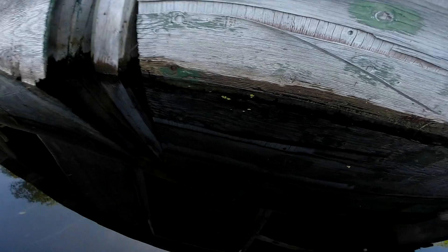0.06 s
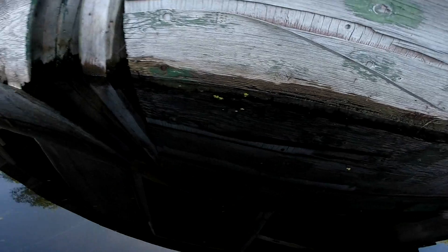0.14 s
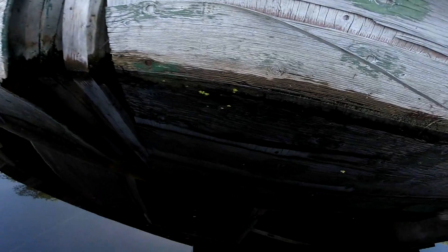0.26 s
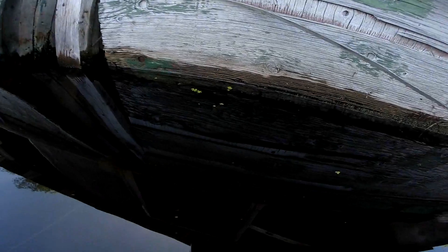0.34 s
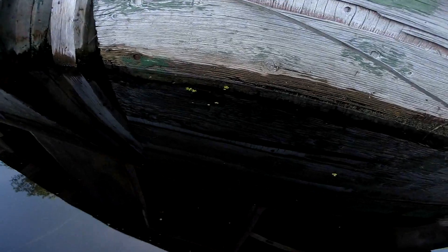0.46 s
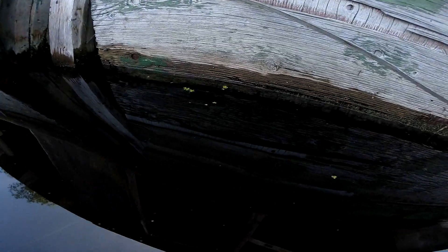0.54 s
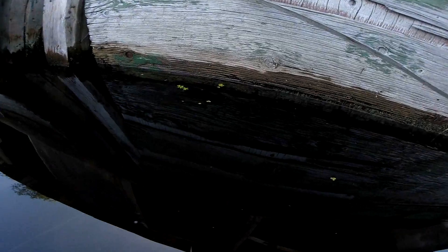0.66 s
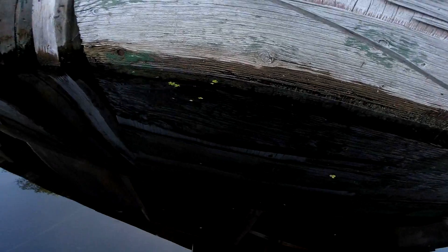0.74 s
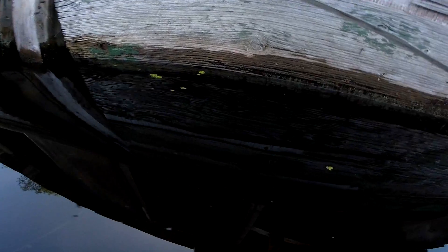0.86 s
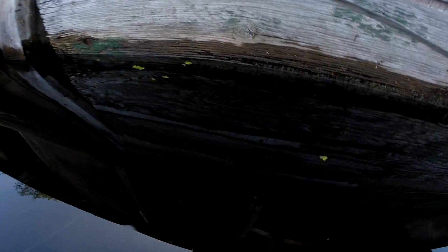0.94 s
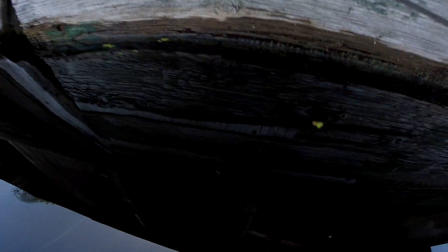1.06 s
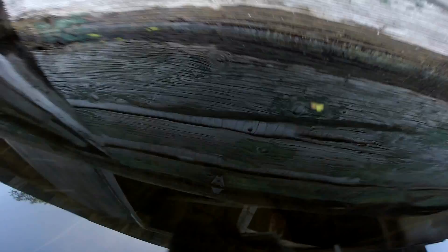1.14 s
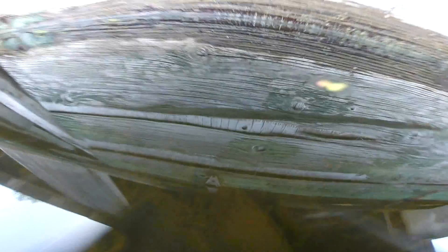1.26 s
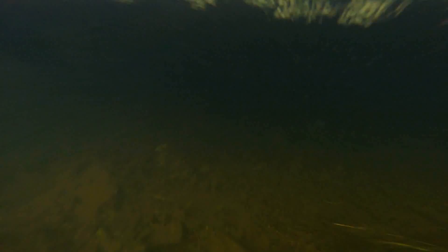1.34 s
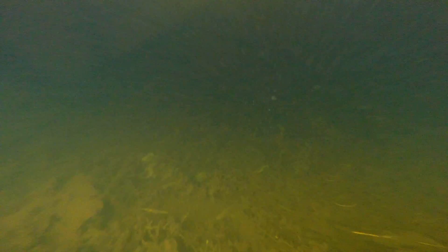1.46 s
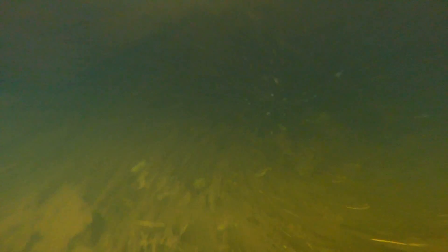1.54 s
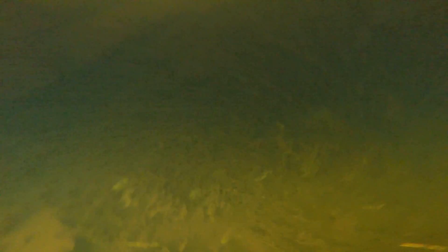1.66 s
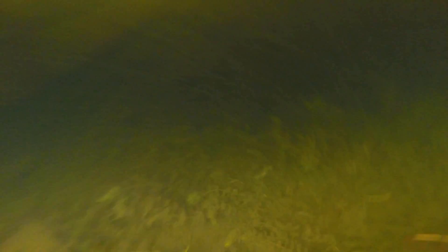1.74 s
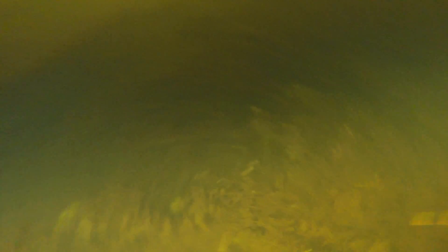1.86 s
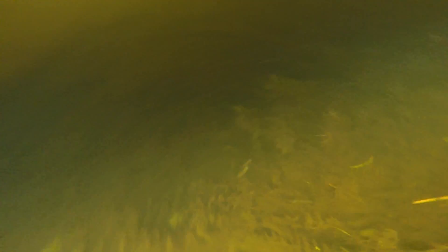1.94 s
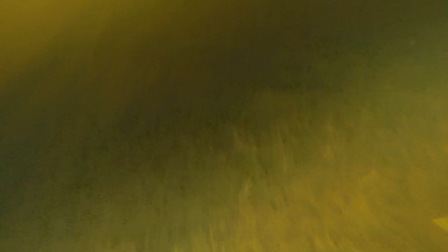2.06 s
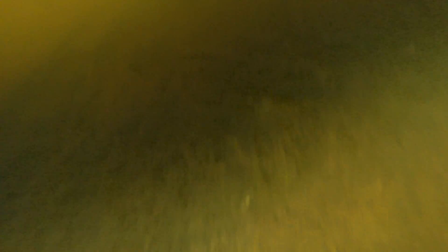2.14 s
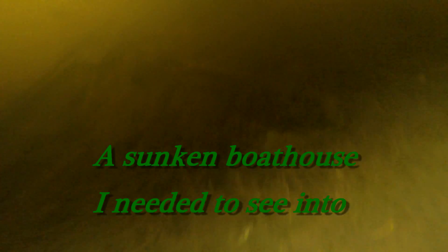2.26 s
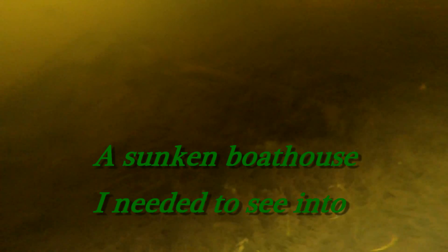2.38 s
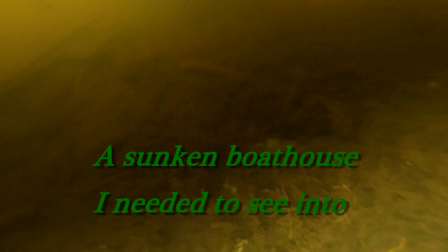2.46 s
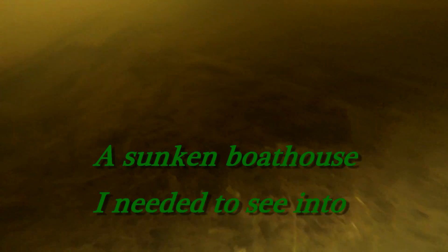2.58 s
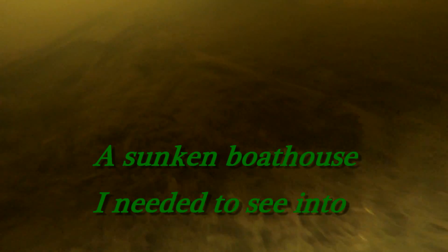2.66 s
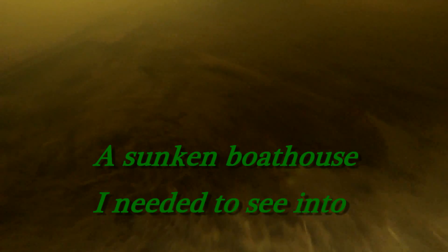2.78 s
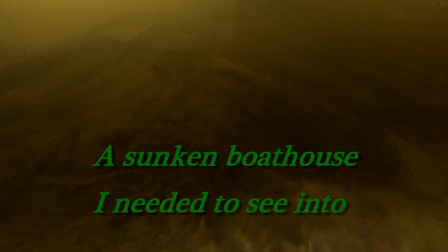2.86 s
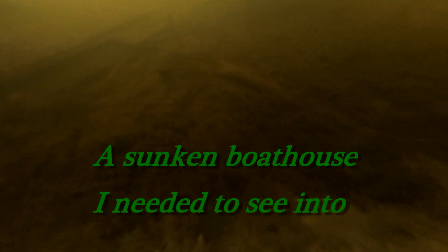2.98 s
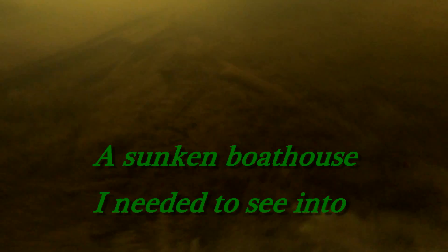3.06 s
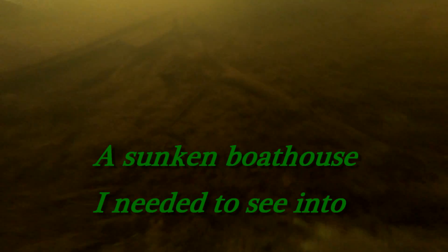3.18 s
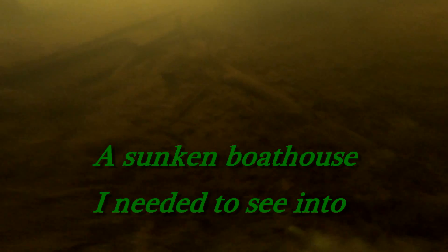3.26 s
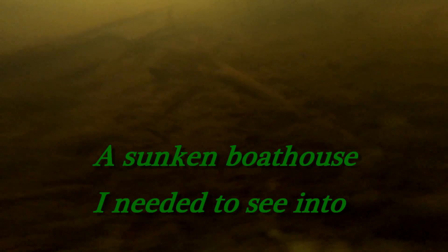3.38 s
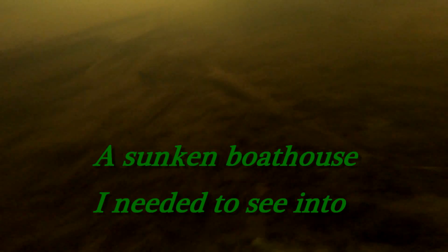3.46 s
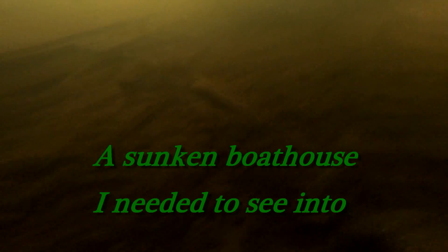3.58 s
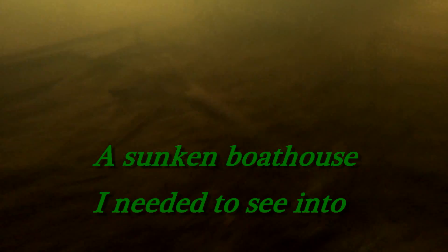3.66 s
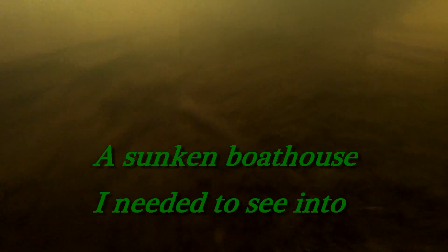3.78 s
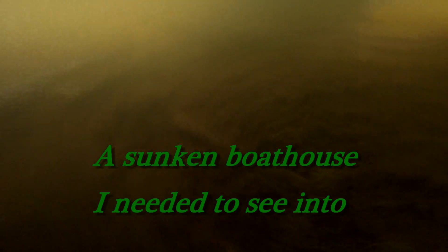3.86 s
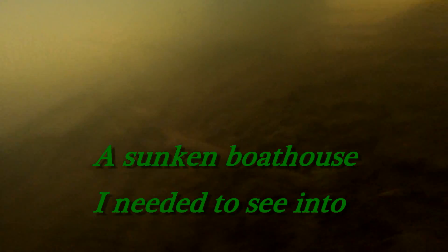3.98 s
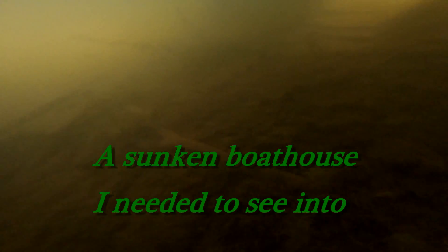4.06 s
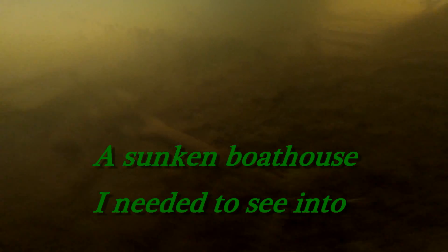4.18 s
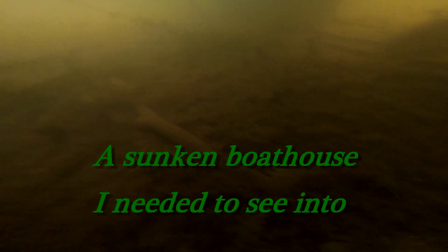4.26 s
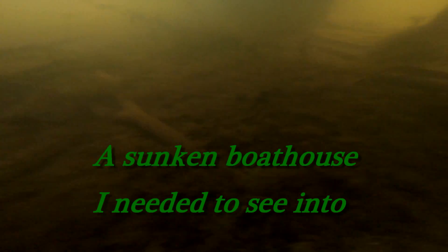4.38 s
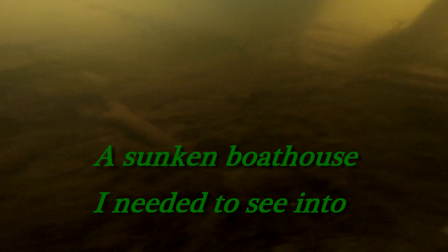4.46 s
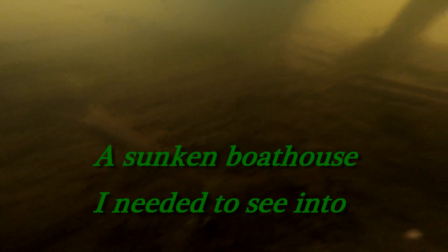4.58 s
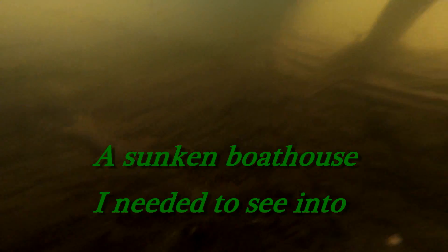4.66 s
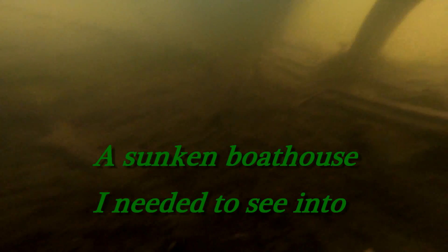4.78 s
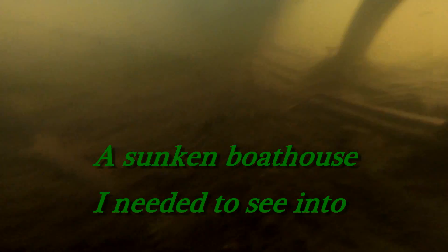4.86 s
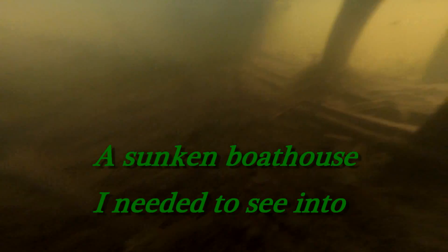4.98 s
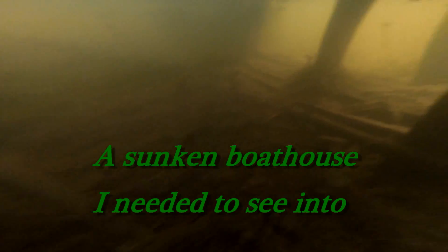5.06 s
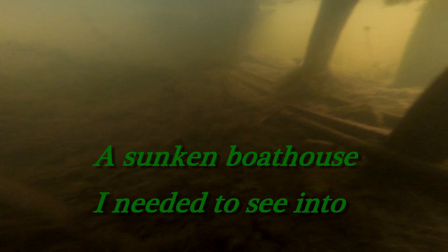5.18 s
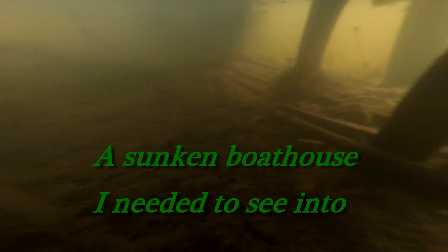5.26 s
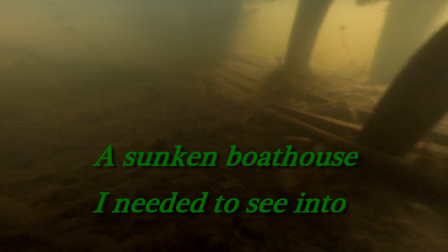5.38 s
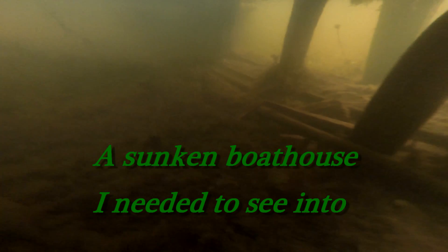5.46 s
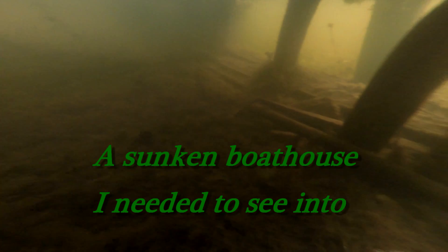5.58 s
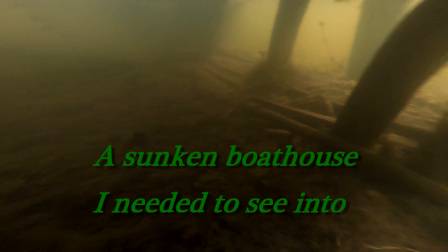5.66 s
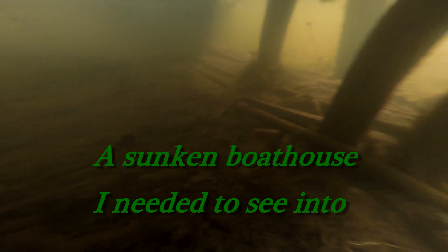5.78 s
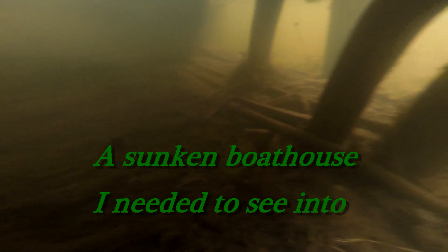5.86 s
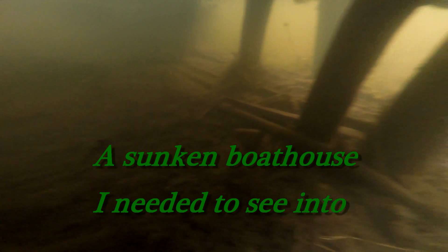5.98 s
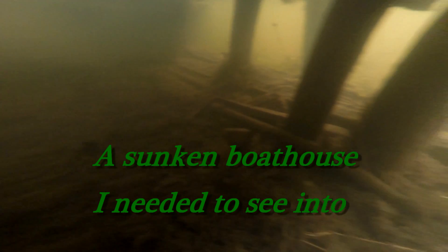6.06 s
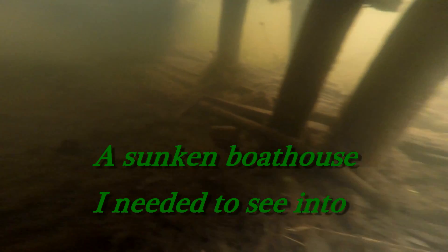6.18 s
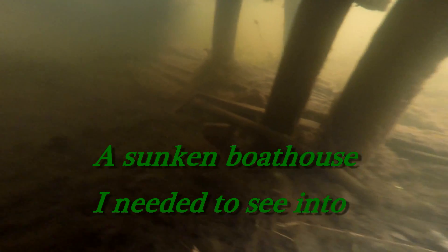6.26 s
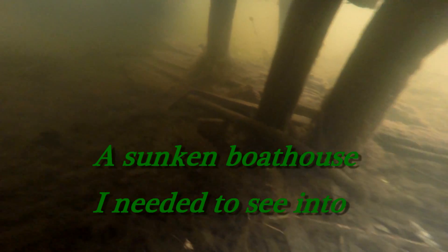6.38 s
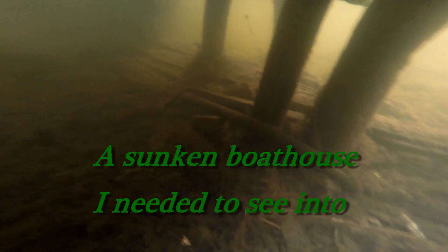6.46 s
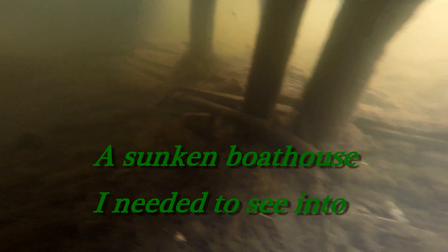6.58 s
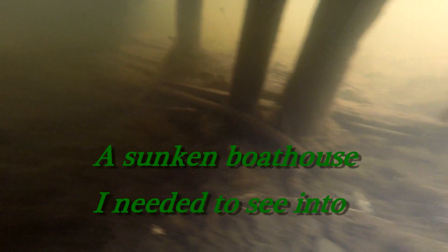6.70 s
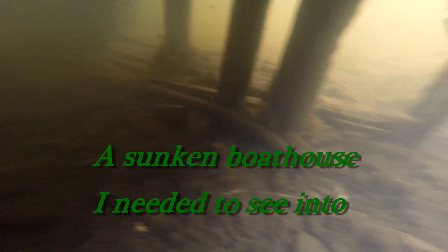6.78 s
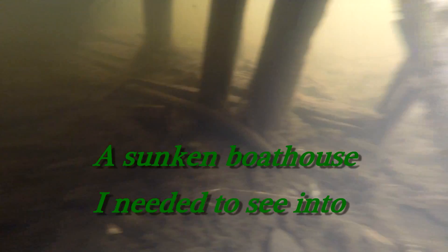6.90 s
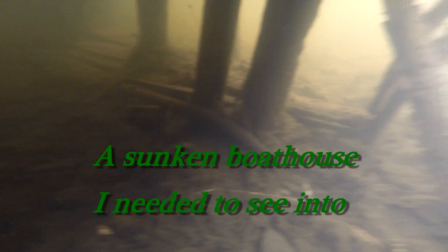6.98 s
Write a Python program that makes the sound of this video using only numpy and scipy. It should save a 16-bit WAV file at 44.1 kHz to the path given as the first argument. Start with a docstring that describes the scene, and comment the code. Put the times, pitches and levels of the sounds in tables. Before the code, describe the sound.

A soft knock and a low rumble come from a swaying pole, heard through a microphone in a sealed housing over faint hiss. At about 1.4 seconds it dips into a river: water splashes and slaps the housing, and bubbles gurgle and ring until around 2 seconds, with a few more pops near 2.4. Underwater, a faint, fast, gritty clatter like a distant boat engine fades in by 2.8 seconds, with a thin pulsing whine. Dull knocks on the pole run from about 2.4 to 4.1 seconds. The hardest, at 3 seconds, briefly ducks all the sound, which then creeps back. The pole rubs and knocks again around 3.7 to 4 seconds as the rumble swells. After that the engine clatter continues to the end at about 7 seconds, slightly duller, over low rumble, with one small click near 6.5 seconds.

```python
"""A low rumble and a soft knock from a swaying camera pole, then a splash as it dips into a river.
Water slaps the housing and trapped air leaves it in ringing bubbles. Under the surface the pole
knocks and rubs, and the fast clatter of what seems a distant boat engine carries through the water.
The hardest knock pushes the camera's gain down, and it creeps back."""
import sys
import numpy as np
from scipy import signal
from scipy.fft import rfft, irfft
from scipy.io import wavfile
from scipy.ndimage import uniform_filter1d, minimum_filter1d

SR = 44100
rng = np.random.default_rng(int(sys.argv[2]) if len(sys.argv) > 2 else 0)


def to_wav(sig):
    """Store sig (one row per channel, or 1-D mono) as 16-bit WAV at the path in sys.argv[1].

    Samples outside -1..1 are clipped; the rate is SR.
    """
    pcm = np.clip(np.atleast_2d(sig), -1, 1) * 32767
    pcm = np.round(pcm).astype(np.int16)
    wavfile.write(sys.argv[1], SR, pcm.T)  # frames by channels


N = 310155
T = np.arange(N) / SR
DIP_S = 1.437   # the housing meets the water


def from_db(db):
    """Decibels to gain."""
    return 10 ** (np.asarray(db) / 20)


def rms_one(x):
    """Scale to unit power."""
    return x / np.sqrt(np.mean(x ** 2) + 1e-20)


def gains(rows):
    """One gain curve per dB column of a table in time."""
    times_s, *columns = np.transpose(rows)
    return [from_db(np.interp(T, times_s, db)) for db in columns]


def fade(t, t60_s):
    """Free decay, 60 dB down after t60_s."""
    return np.exp(-np.log(1000) * t / t60_s)


def swells(rows, attack_s):
    """Gain curve of swells that rise and decay, summed in power."""
    power = np.zeros(N)
    for peak_s, db, t60_s in rows:
        rise = np.exp(np.minimum(T - peak_s, 0) / attack_s)
        power += (from_db(db) * rise * fade(np.maximum(T - peak_s, 0), t60_s)) ** 2
    return np.sqrt(power)


def add(out, start_s, sound):
    """Mix a sound in at start_s."""
    start = max(round(start_s * SR), 0)
    out[start:start + len(sound)] += sound[:max(N - start, 0)]


def band(x, low_hz, high_hz, order=2):
    """Butterworth band-pass."""
    return signal.sosfilt(signal.butter(order, [low_hz, high_hz], "band", fs=SR, output="sos"), x)


def resonate(x, hz, width_hz):
    """Two-pole resonance, peak gain 1."""
    r = np.exp(-np.pi * width_hz / SR)
    feedback = [1, -2 * r * np.cos(2 * np.pi * hz / SR), r * r]
    return signal.lfilter(np.array([1, 0, -1]) * (1 - r * r) / 2, feedback, x)


def band_noise(low_hz, high_hz, samples=N):
    """Band-passed noise, rms 1."""
    return rms_one(band(rng.standard_normal(samples), low_hz, high_hz))


def noise(spectrum):
    """Noise shaped by (Hz, dB) points, rms 1."""
    hz, db = np.transpose(spectrum)
    bins_hz = np.maximum(np.arange(N // 2 + 1) * SR / N, 1)
    shape = from_db(np.interp(np.log(bins_hz), np.log(hz), db))
    return rms_one(irfft(rfft(rng.standard_normal(N)) * shape, N))


def handling(rest_db=-66):
    """The swaying pole rumbles and slips unevenly in the grip; a faint rub stays under water."""
    # Pole sway. Each row: time in seconds, rumble level in dB.
    sway = [(0,-37),(.5,-46.5),(1.6,-37),(2.05,-40.5),(2.45,-31),(3.6,-32),(4.05,-25.5),(5.1,-36.5),(7.03,-34.5)]
    # Slips in the grip. Each row: peak time in seconds, level in dB, t60 in seconds.
    rubs = [(2.2,-53,1),(2.8,-46,.6),(3.32,-43,0.68),(3.73,-34,0.54),(3.86,-44,0.47),(3.98,-36.5,0.59),(4.2,-43,1)]
    # Spectra of rumble and rub. Each row: frequency in Hz, relative density in dB.
    rumble_spectrum = [(8.8, -29), (15, 3), (27, 5.5), (54, -9.5), (87, -4), (101, -11), (119, -14.5),
                       (162, -45.5), (300, -33.5), (390, -64), (660, -120)]
    rub_spectrum = [(120,-13),(200,-10.5),(310,2),(440,-6.5),(680,-0.5),(950,-13),(1400,-4),(2500,-62),(9000,-93)]
    roughness = rms_one(np.exp(0.13 * band_noise(45, 120)))
    rub_gain = swells(rubs, attack_s=0.029) + from_db(rest_db) * (T > DIP_S)
    return gains(sway)[0] * noise(rumble_spectrum) + rub_gain * roughness * noise(rub_spectrum)


def hiss(level_db=-55):
    """Steady, faint background noise."""
    # Noise floor. Each row: frequency in Hz, relative density in dB.
    spectrum = [(88, -25), (150, 4.5), (226, -1.5), (270, -3.5), (309, -4), (702, -9.5), (1260, -14.5),
                (1420, -8), (2400, -16), (3490, -19), (13700, -35.5), (15100, -29.5), (16000, -54)]
    return from_db(level_db) * noise(spectrum)


def knocks(ring_db=-13.5, ring_db_per_db=0.65, shudder_db=-10.5, clack_lead_s=0.0058, air_ratio=1.18):
    """A contact clacks, shoves the housing to and fro once, and leaves the pole ringing and shuddering."""
    # Knocks on the pole. Each row: time in seconds, thud level in dB, thud in Hz, clack peak in dB.
    contacts = [(0.045,-22.5,77.5,-65),(2.366,-27,43.4,-26),(2.721,-18.5,45.5,-52),(2.75,-11,79,-36),(2.828,-15.5,53.7,-36),(3.0076,19,100,8),(3.054,1,87,-31.5),
                (3.127,-13,61,-20.5),(3.36,-11,40,-57),(3.392,-29.5,44.7,-56),(3.747,-17.5,81,-38),(3.783,-26,74,-30),(3.968,-9,74,-10.5),(4.006,-14,85,-46),(4.079,-15,62,-51)]
    # Pole modes under water. Each row: frequency in Hz, relative level in dB, t60 in seconds.
    modes = [(48.6,14,0.055),(91.6,10.5,0.22),(134.2,-9.5,0.4),(200,-25,0.105)]
    out, t = np.zeros(N), T[:SR // 2]
    for at_s, thud_db, thud_hz, clack_db in contacts:
        swing = 2 * np.pi * thud_hz * (T - at_s)
        out += from_db(thud_db) * swing * np.exp((1 - swing ** 2) / 2)
        tuning = air_ratio if at_s < DIP_S else 1   # modes lie higher in air
        ring = sum(from_db(db) * np.sin(2 * np.pi * tuning * hz * t) * fade(t, t60_s)
                   for hz, db, t60_s in modes)
        shudder = from_db(shudder_db) * band_noise(35, 163, len(t)) * fade(t, t60_s=0.34)
        onset = 1 - fade(t, 0.024)
        add(out, at_s, from_db(ring_db + ring_db_per_db * thud_db) * (ring + shudder) * onset)
        clack = band(rng.standard_normal(len(t)) * fade(t, t60_s=0.039), 170, 620)
        add(out, at_s - clack_lead_s, from_db(clack_db) * clack / np.abs(clack).max())
    return out


def bubble(hz, t60_s, rise, attack_cycles):
    """An air pocket rings, its pitch creeping up as it decays."""
    t = T[:int(1.5 * t60_s * SR)]
    phase = 2 * np.pi * hz * t * (1 + rise * t / t60_s / 2)
    onset = (1 - np.exp(-t * hz / attack_cycles)) ** 2
    return np.sin(phase) * fade(t, t60_s) * onset


def froth(count=480, span_s=0.7, low_hz=480, high_hz=4200, ring_cycles=15, attack_s=0.0044,
          fizz_db=-25, fizz_per_s=900, fizz_spread_db=6.0):
    """Each surge drags under a swarm of small bubbles; the tiniest crackle."""
    # Water closing over the housing. Each row: peak time in seconds, level in dB, t60 in seconds.
    surges = [(1.438,-32,0.62),(1.562,-26.5,0.7),(1.715,-14.5,0.081),(1.79,-25,0.14),(1.83,-46,0.083)]
    swarm = np.zeros(N)
    for when, height, strength in rng.random((count, 3)):
        hz = low_hz * (high_hz / low_hz) ** height
        gain = strength ** 2 * (hz / low_hz) ** -0.12
        ping = bubble(hz, ring_cycles / hz, rise=0.12, attack_cycles=0.8)
        add(swarm, DIP_S - attack_s + when * span_s, gain * ping)
    pops = rng.random(N) < fizz_per_s / SR
    pop_db = fizz_spread_db * np.minimum(rng.exponential(1, N), 4)
    fizz = from_db(fizz_db) * rms_one(band(pops * from_db(pop_db), 2490, 13000))
    return (swarm / np.std(swarm[swarm != 0]) + fizz) * swells(surges, attack_s)


def gurgle(level_db=4.0, wobble_depth=0.16, pinch_db=-35.5, pinch_t60_s=0.0065):
    """Bubbles click as they pinch off, then ring and wobble; the housing thumps twice in the splash."""
    # Ringing bubbles, and two low housing thumps voiced the same way. Each row: start in seconds,
    # nominal pitch in Hz, relative level in dB, nominal t60 in seconds.
    bubbles_and_thumps = [(1.4404,3030,-1.5,0.0044),(1.457,125,-4.5,0.092),(1.46,305,-13.5,0.032),(1.4818,830,-3.5,0.013),(1.4886,2010,-16,0.027),(1.5193,1600,-19.5,0.025),(1.5402,1520,-17.5,0.019),
                          (1.5653,2055,-2.5,0.013),(1.5702,1375,-10.5,0.016),(1.591,2990,-9,0.014),(1.610,724,-8,0.043),(1.644,4730,-25,0.017),(1.66,1600,-15,0.017),(1.678,1934,-17.5,0.074),(1.685,3150,-10,0.015),
                          (1.7124,308,3.5,0.0072),(1.714,87.6,-11,0.12),(1.762,790,-16,0.022),(1.776,407,-17,0.049),(1.7913,754,-7.5,0.053),(1.8039,2800,-11,0.014),(1.817,747,-12.5,0.018),(1.829,2040,-21,0.054),(1.840,2480,-25,0.033),(1.842,730,-18.5,.07),
                          (1.8641,813,-10,0.05),(1.8656,497,-15,0.05),(1.897,787,-25.5,0.083),(1.921,2320,-20.5,0.022),(2.026,730,-42.5,0.11),(2.079,706,-7,0.0092),(2.095,883,-29.5,0.052),(2.1486,710,-12.5,0.0098),
                          (2.2697,490,-20,0.031),(2.2863,486,-15.5,0.015),(2.3446,620,-16.5,.018),(2.3712,576,-11.5,0.0091),(2.4397,8300,-16,0.0063),(2.439,730,-26,.021),
                          (4.001,1180,-29,0.039),(4.2,2560,-21.5,0.0094)]
    # Side notes of an out-of-round bubble. Each row: ratio to nominal pitch, relative level in dB.
    side_notes = [(.6,-13),(1.9,-17.5)]
    main_note = [(0.93, 0.011)]   # same columns
    rings, pinches, t = np.zeros(N), np.zeros(N), T[:SR // 20]
    for start_s, hz, db, t60_s in bubbles_and_thumps:
        for ratio, note_db in main_note + (side_notes if 350 < hz < 1700 else []):
            ping = bubble(hz * ratio, t60_s / ratio, rise=0.09, attack_cycles=0.3)
            add(rings, start_s, from_db(db + level_db + note_db) * ping)
        click = rng.standard_normal(len(t)) * fade(t, pinch_t60_s)
        add(pinches, start_s, from_db(db + pinch_db) * click)
    wobble = 1 + wobble_depth * band_noise(93, 670)
    return rings * wobble + band(pinches + 1e-18, 1200, 6500)


def slaps(edge_ratio=1.29, level_db=-10.0):
    """Water slaps the housing and films burst on it, each a brief, broad crack."""
    # Cracks. Each row: start in seconds, relative level in dB, centre in Hz, t60 in seconds.
    cracks = [(1.4416,-12.5,4590,0.047),(1.453,-2,8900,.008),(1.4574,-1,6200,0.004),(1.459,-8,4970,0.03),(1.481,-12.5,4800,0.024),(1.5056,-31.5,7560,.017),(1.5606,-26.5,11900,0.0024),(1.58,-17,3560,0.028),
              (1.621,-2.5,5260,0.0099),(1.662,-12.5,4500,0.0047),(1.686,-15,2810,0.0034),(1.7071,-10.5,6950,0.0075),(1.713,-5.5,8650,0.0095),(1.717,-7,2400,0.027),
              (1.7744,-13,4930,0.009),(1.798,-18,8300,0.0052),(2.3178,-20.5,2740,0.0059),(2.4403,-13,7000,0.0036),(2.493,-12,1940,0.011),
              (3.6274,-39,8400,0.0034),(4.613,-40,7200,0.0093),(6.4855,-18,1980,0.04),(6.487,-24.5,5440,0.025)]
    out, t = np.zeros(N), T[:SR // 10]
    for start_s, db, hz, t60_s in cracks:
        crack = band(rng.standard_normal(len(t)) * fade(t, t60_s), hz / edge_ratio, hz * edge_ratio)
        onset_rms = np.std(crack[:SR // 700])
        add(out, start_s, from_db(db + level_db) * crack / onset_rms)
    return band(out, 240, 12000, order=5)


def engine_cycles(first_beat_s=0.0703):
    """Engine cycles since the first beat, per sample."""
    # Engine speed. Each row: time in seconds, cycles per second.
    speed = [(2.35,11.964),(2.96,12.244),(4.26,12.261),(4.71,11.625),(5.34,12.691),(5.94,11.864),(6.63,11.871),(6.78,12.936)]
    cycles = np.cumsum(np.interp(T, *np.transpose(speed))) / SR
    return cycles - np.interp(first_beat_s, T, cycles)


def clatter_filter(x, resonances, leak_db=-50.0):
    """The engine's resonances in alternating polarity; shallow water passes only the highs."""
    modes = sum((-1) ** k * from_db(db) * resonate(resonate(x, hz, 1.33 * width_hz), hz, 1.31 * width_hz)
                for k, (hz, width_hz, db) in enumerate(resonances))
    return band(modes + from_db(leak_db) * x, 1180, 13000, order=6)


def engine(tick_db=4.5, rattle_db=1.0, ring_gain=3.2, bright_hz=2800, jitter_s=0.0004, jitter_db=0.8):
    """Four uneven beats a cycle, each a gritty tick, a short rattle and a ring, over a rough wash."""
    # Beats of one cycle. Each entry: relative level in dB.
    beats_db = [1, -12, -5.5, -11]
    # The engine fades in after the splash, then dulls.
    # Each row: time in seconds, wash gain in dB, beat gain in dB, treble lift in dB.
    levels = [(2.0,-59,-39,8.5),(2.75,-43.5,-28.5,7.5),(4.2,-42,-28.5,4),(5.3,-43,-30,1.7),(6.1,-44,-28,1.6),(7.03,-46.5,-27,2.5)]
    # Clatter resonances. Each row: centre in Hz, nominal width in Hz, relative level in dB.
    resonances = [(1261,72,0),(1615,213,2.5),(1960,480,-7),(2588,284,-5),(2882,35,-10.5),(3053,260,-17.5),(3945,690,-21.5),(4705,410,-25.5),(5580,420,-31.5),(6830,410,-33),(7560,83,-37.5),(10010,870,-45)]
    cycles, per_cycle = engine_cycles(), len(beats_db)
    count = int(cycles[-1] * per_cycle) + 1
    impulses, bursts, t = np.zeros(N), np.zeros(N), T[:SR // 10]
    burst = fade(t, t60_s=0.021) * (1 - fade(t, 0.0029))
    for k, (late_s, stray_db) in enumerate(rng.normal(0, [jitter_s, jitter_db], (count, 2))):
        start_s = np.interp(k / per_cycle, cycles, T) + late_s
        blow = from_db(beats_db[k % per_cycle] + stray_db)
        add(impulses, start_s, np.array([blow]))
        add(bursts, start_s, blow * burst)
    wash, force, brightness = gains(levels)
    wash, force = np.array([wash, force]) * (T > DIP_S)   # heard only under water
    grit = rms_one(np.exp(0.2 * band_noise(40, 400)))
    white, tick_noise = rng.standard_normal((2, N))
    drive = white * np.hypot(wash * grit, force * bursts * from_db(rattle_db))
    ticks = clatter_filter(force * bursts * tick_noise * from_db(tick_db), resonances[5:])
    clatter = (clatter_filter(drive, resonances) + ticks) / np.std(clatter_filter(white, resonances))
    highs = signal.sosfiltfilt(signal.butter(2, bright_hz, "high", fs=SR, output="sos"), clatter)
    ring_hz = resonances[1][0]   # the strongest resonance
    ring = ring_gain * np.sin(2 * np.pi * ring_hz * t) * fade(t, t60_s=0.028) * (1 - fade(t, 0.01))
    rings = signal.fftconvolve(force * impulses / brightness, ring)[:N]
    return clatter + (brightness - 1) * highs + rings


def whine(sharpness=5.0, bend=0.008, pitch_jitter=0.0062, waver_rms_db=1.5, fade_in_s=0.5):
    """Thin whistles swell and sag in pitch once per engine cycle."""
    # Whistles. Each row: pitch in Hz, peak level in dB, place of the peak in the cycle from 0 to 1.
    whistles = [(2860,-56,.82),(5980,-62,.38),(10350,-71.5,.92)]
    cycles, out = engine_cycles(), np.zeros(N)
    for hz, db, place in whistles:
        angle = 2 * np.pi * (cycles - place)
        pitch_hz = hz * (1 - bend * np.sin(angle) + pitch_jitter * band_noise(4.9, 150))
        waver_db = waver_rms_db * noise([(1, 0), (8, 0), (30, -60), (200, -140)])
        swell = np.exp(sharpness * (np.cos(angle) - 1) / 2)
        out += from_db(db + waver_db) * swell * np.sin(2 * np.pi * np.cumsum(pitch_hz) / SR)
    submerged = np.clip((T - DIP_S) / fade_in_s, 0, 1)
    return out * submerged


def scene():
    """Everything reaches one microphone inside the sealed housing."""
    splash = slaps() + gurgle() + froth()
    return (splash + knocks() + engine() + whine() + handling() + hiss())[None]


def record(dry, limit_db=2.0, release_db_per_s=23.0, stopband_hz=16800):
    """Gain control ducks just ahead of an overload and recovers slowly; peaks clip, the top is cut."""
    over_db = np.maximum(20 * np.log10(np.abs(dry[0]) + 1e-9) - limit_db, 0)
    held_db = np.maximum.accumulate(over_db + release_db_per_s * T) - release_db_per_s * T
    gain_db = uniform_filter1d(minimum_filter1d(-held_db, size=SR // 50), size=SR // 200)
    clipped = np.clip(dry * from_db(gain_db), -1, 1)
    return signal.sosfilt(signal.cheby2(14, 60, stopband_hz, fs=SR, output="sos"), clipped)


dry = scene()
out = record(dry)
to_wav(out)
```